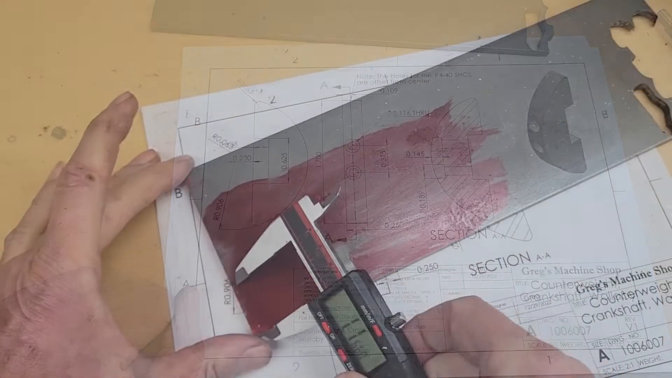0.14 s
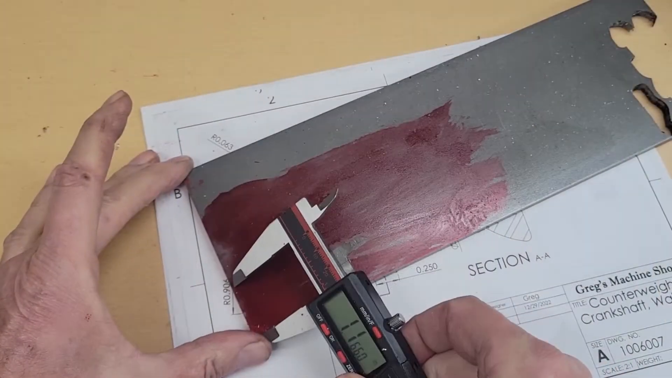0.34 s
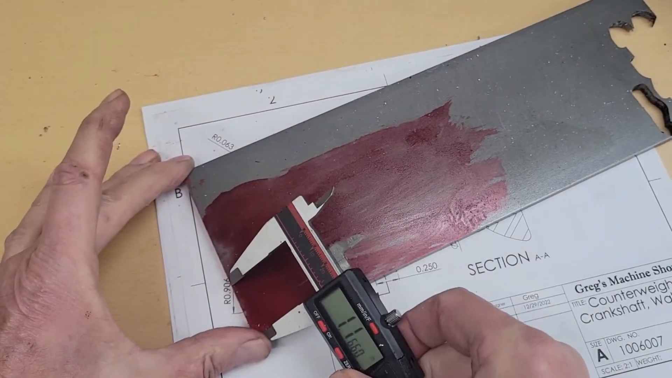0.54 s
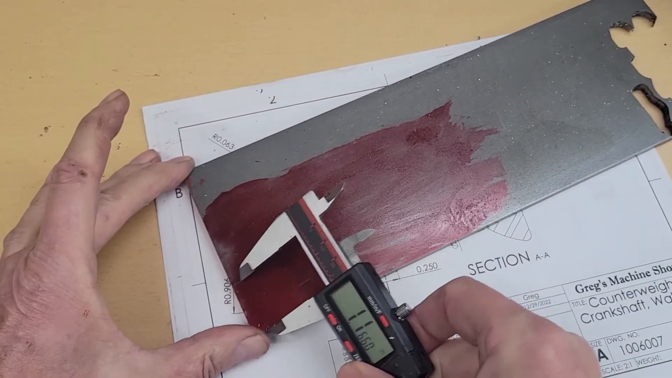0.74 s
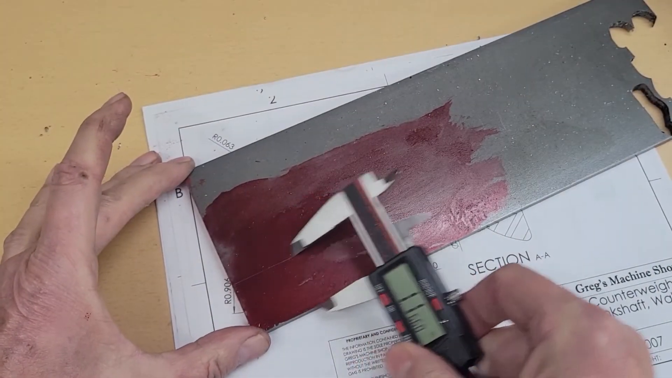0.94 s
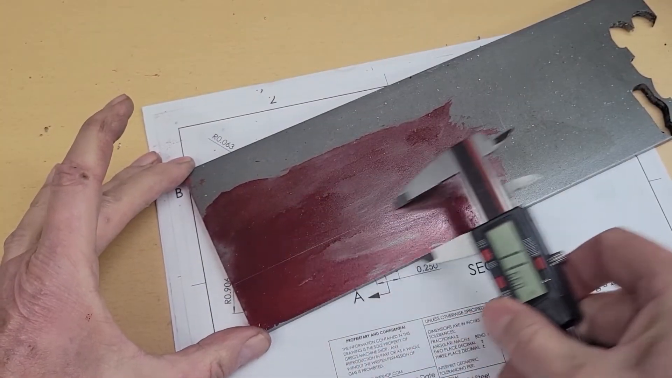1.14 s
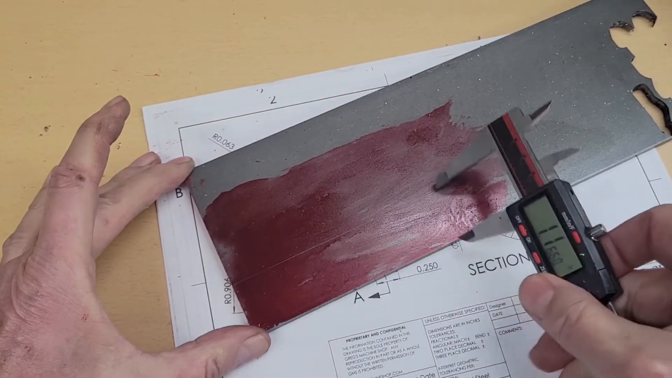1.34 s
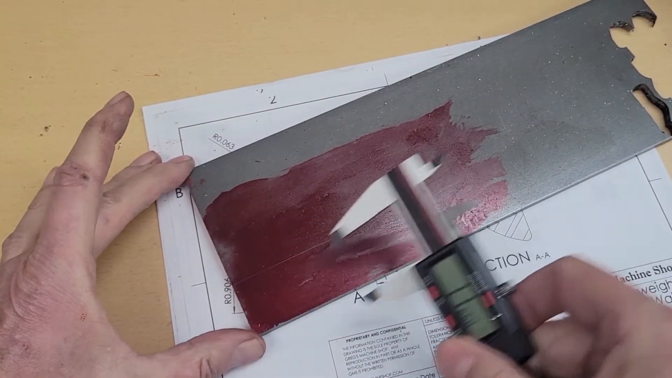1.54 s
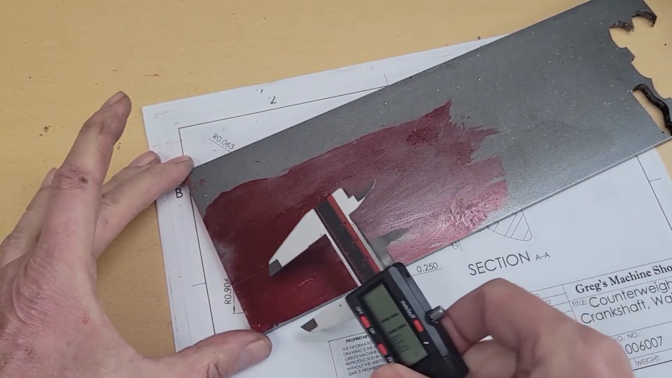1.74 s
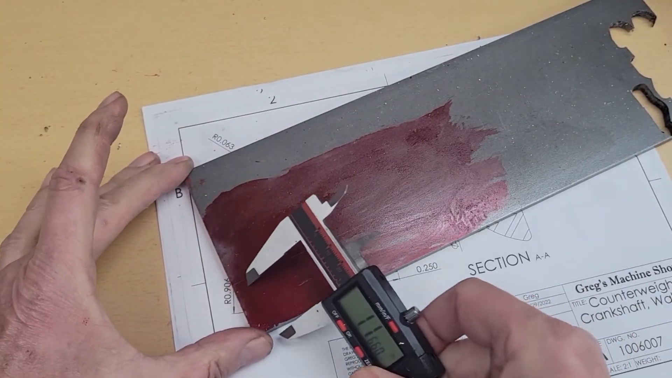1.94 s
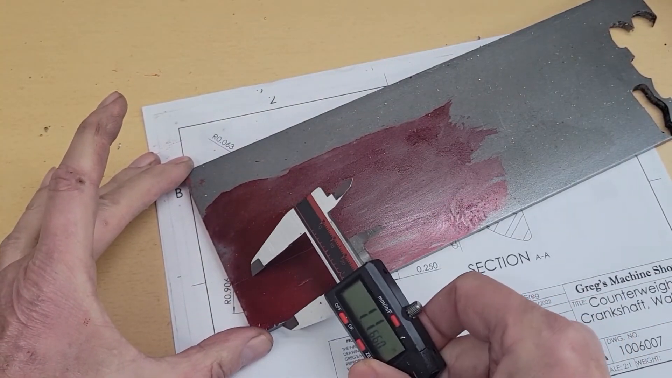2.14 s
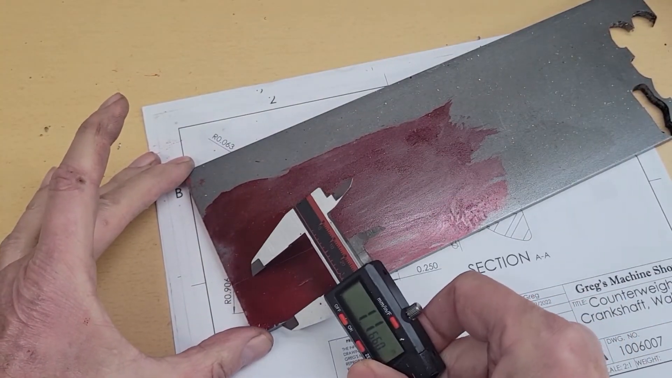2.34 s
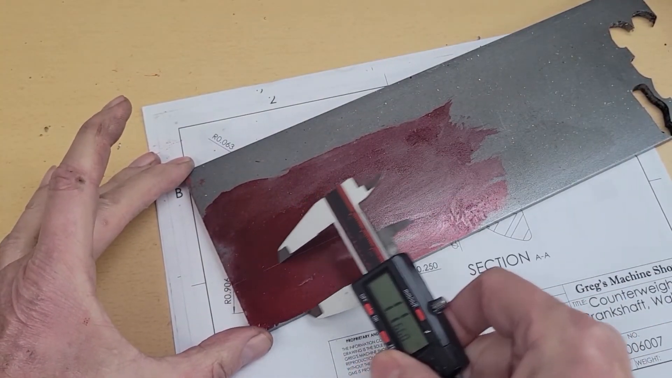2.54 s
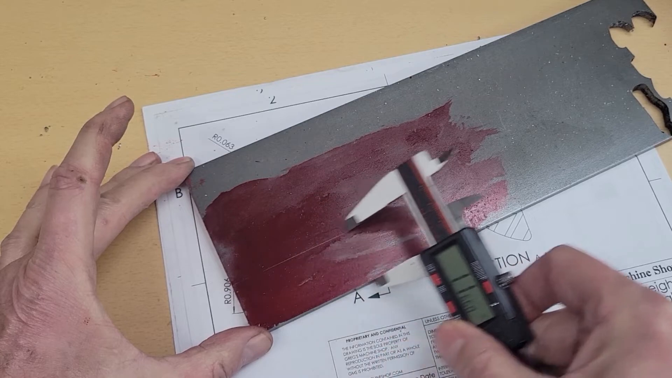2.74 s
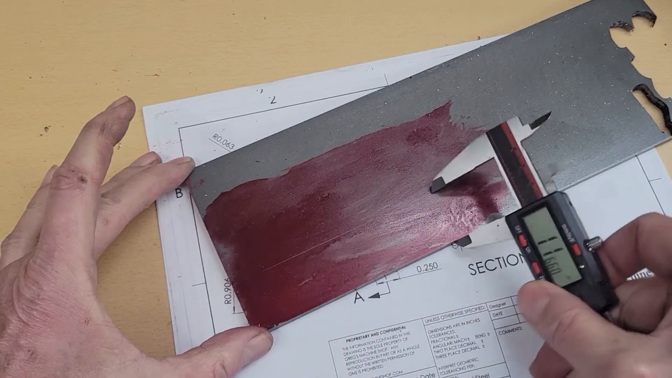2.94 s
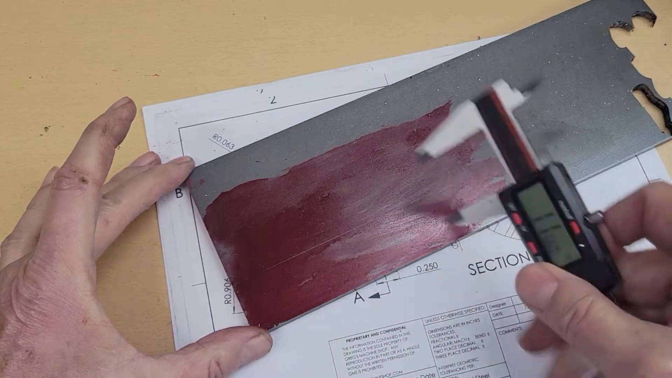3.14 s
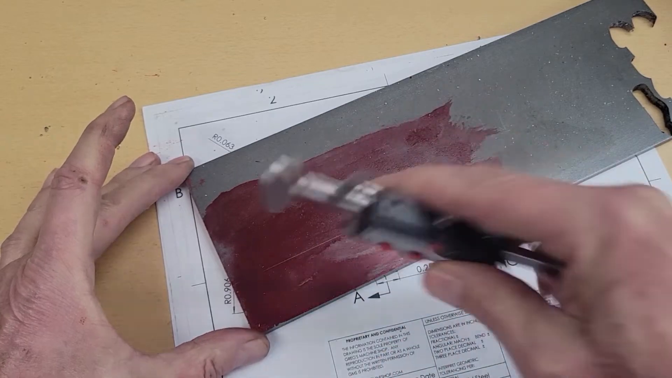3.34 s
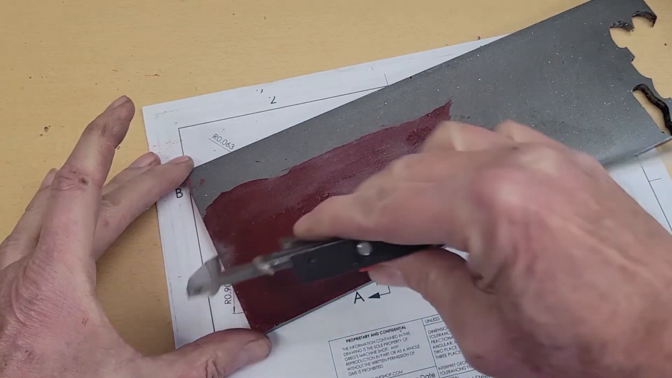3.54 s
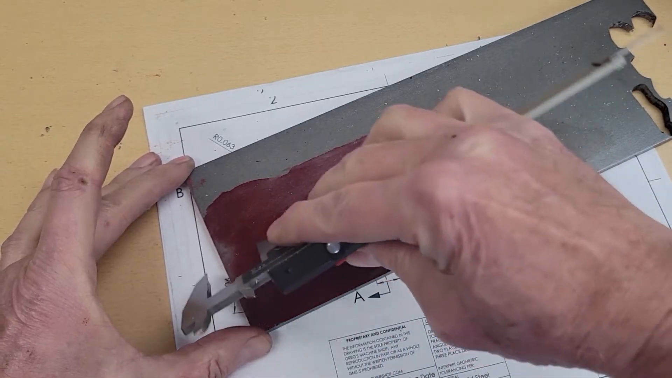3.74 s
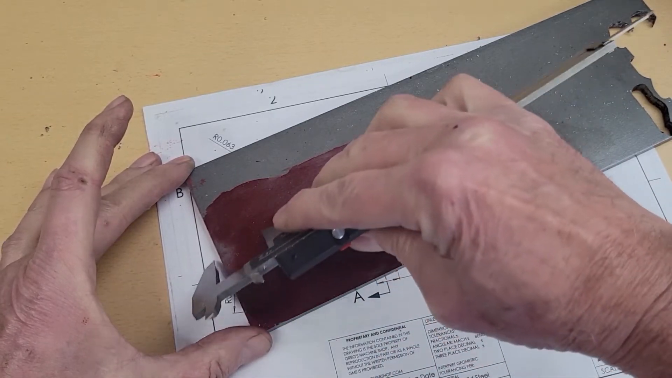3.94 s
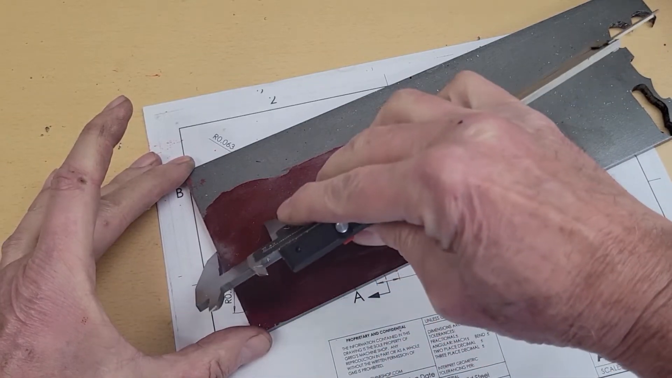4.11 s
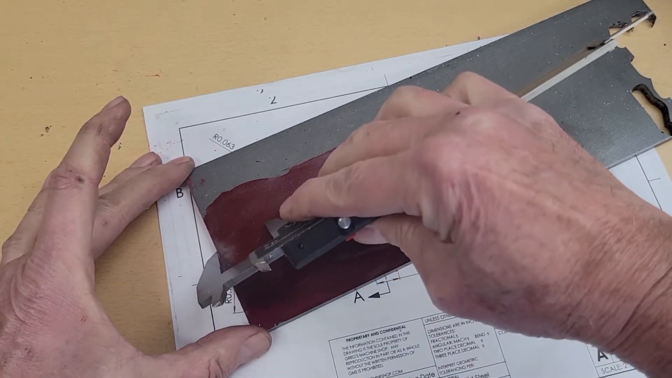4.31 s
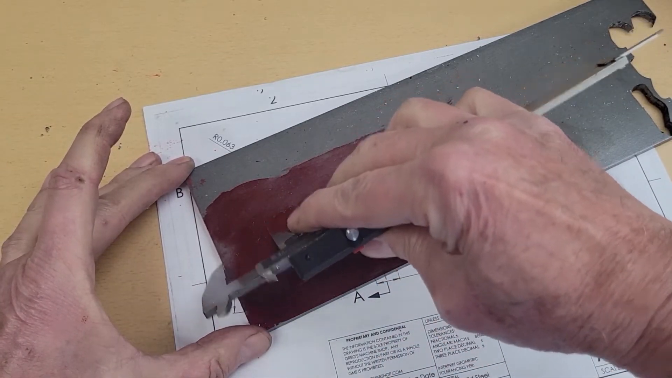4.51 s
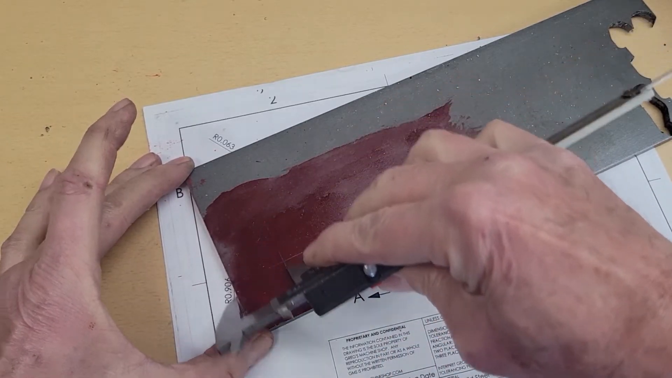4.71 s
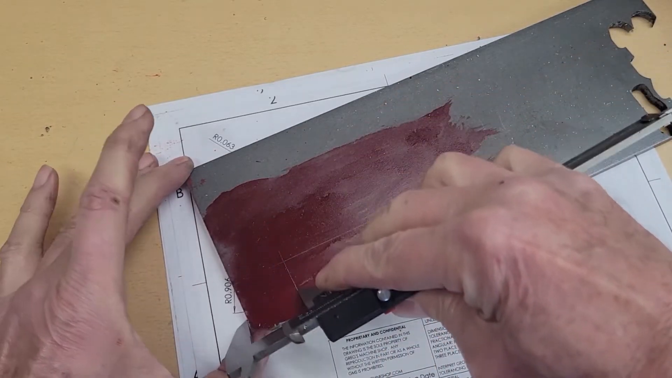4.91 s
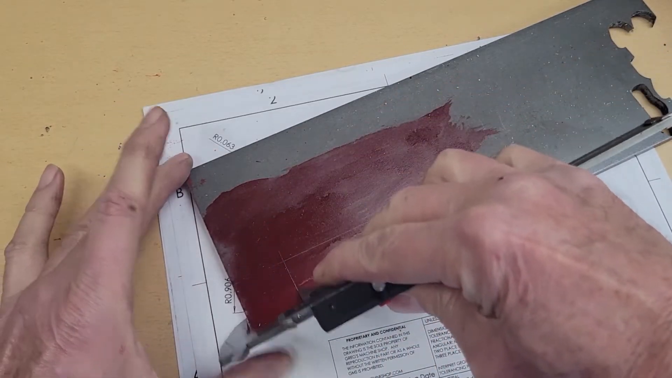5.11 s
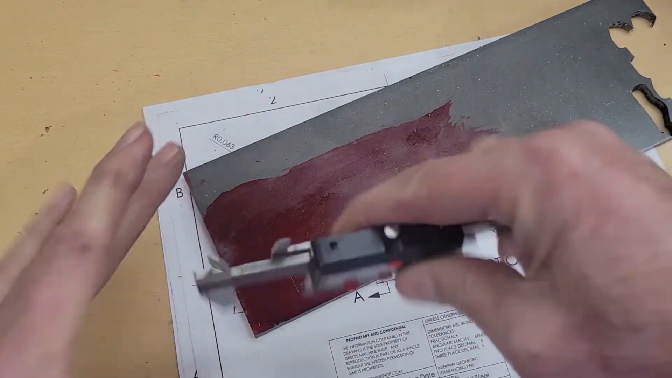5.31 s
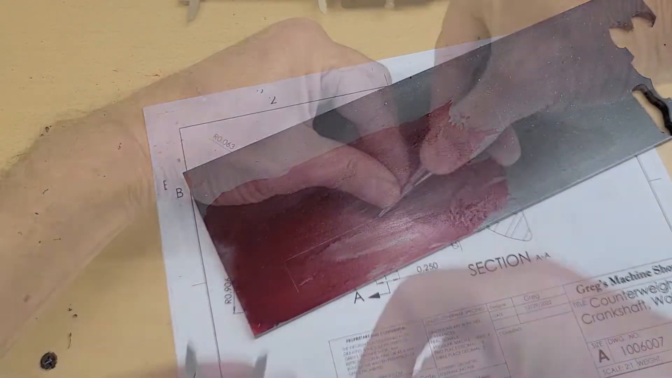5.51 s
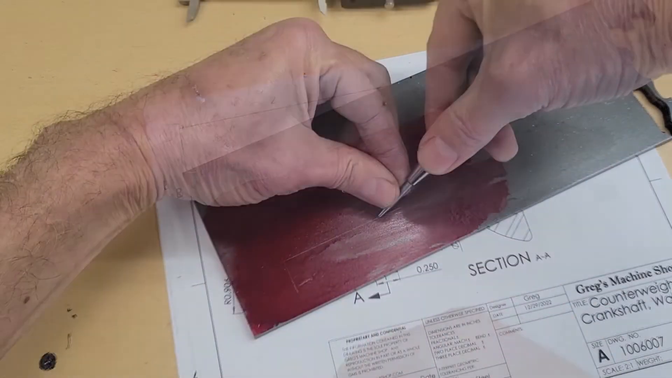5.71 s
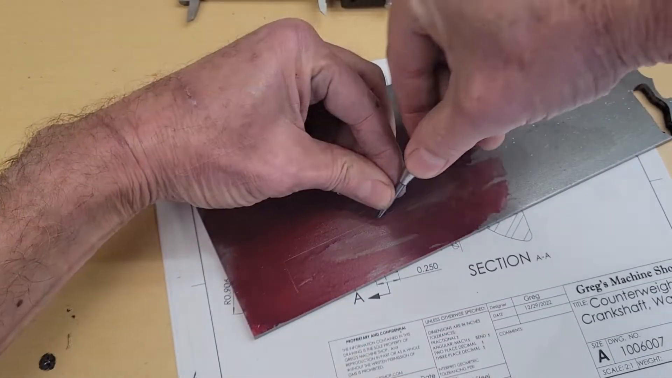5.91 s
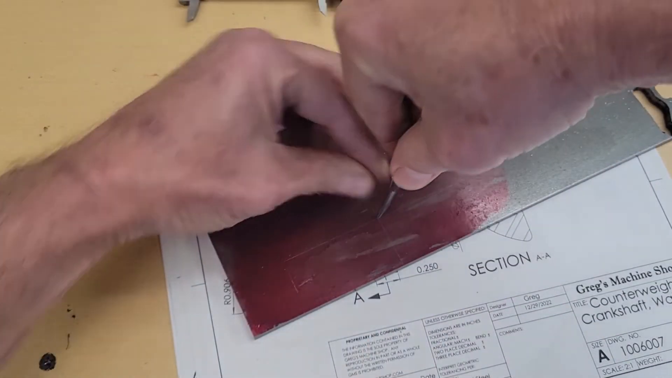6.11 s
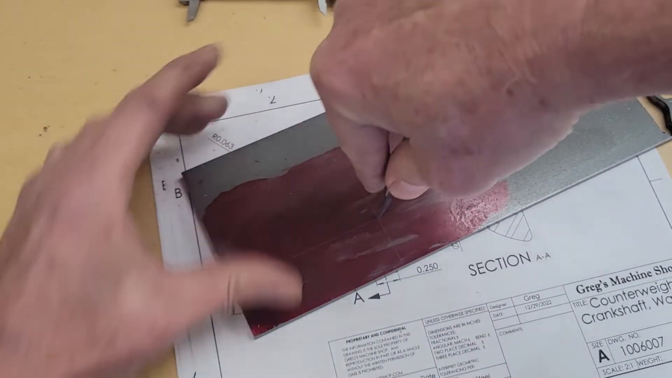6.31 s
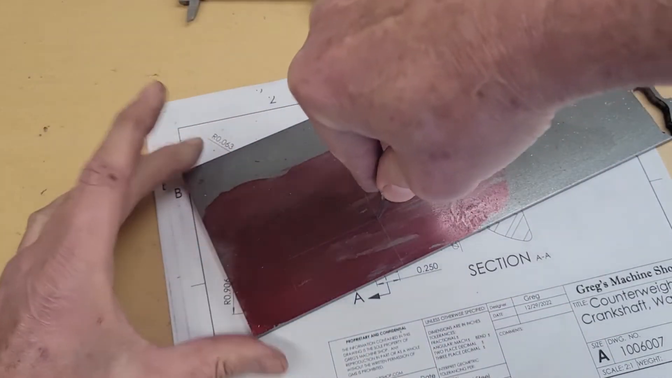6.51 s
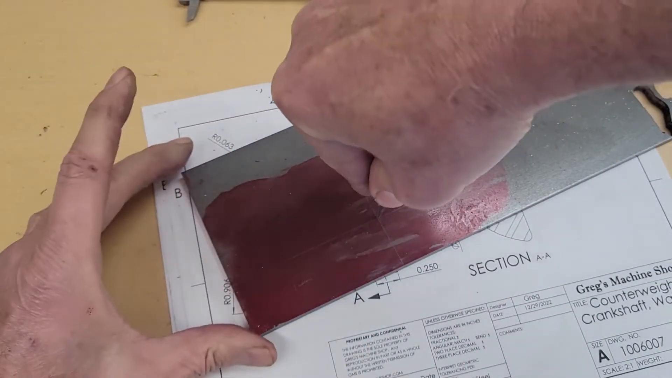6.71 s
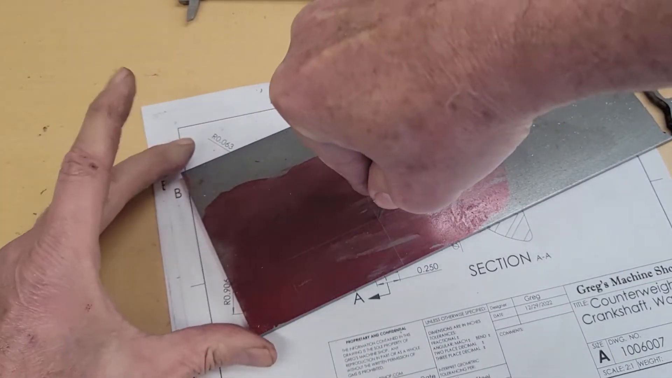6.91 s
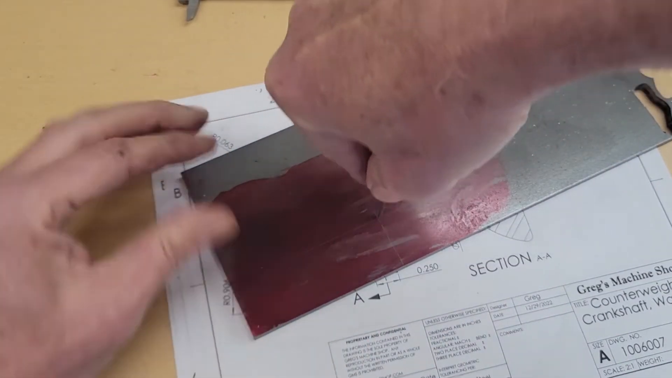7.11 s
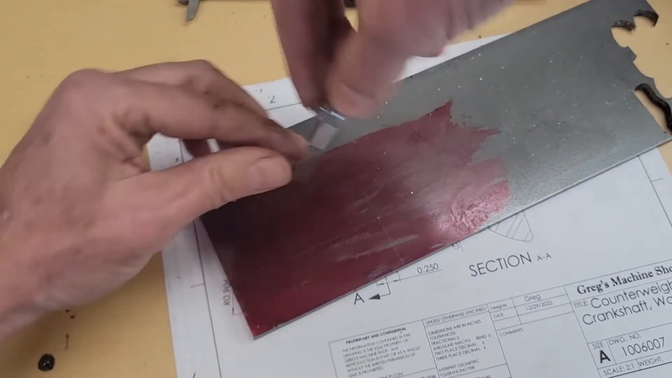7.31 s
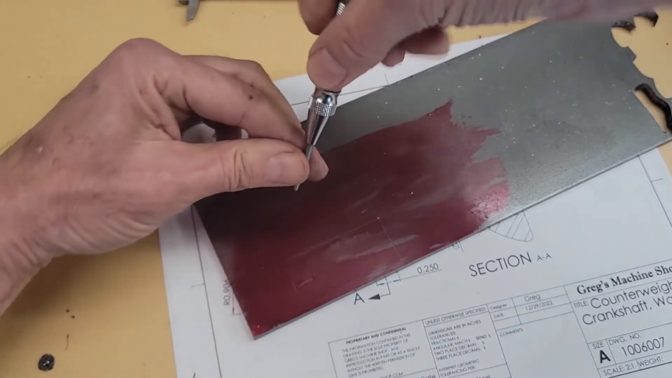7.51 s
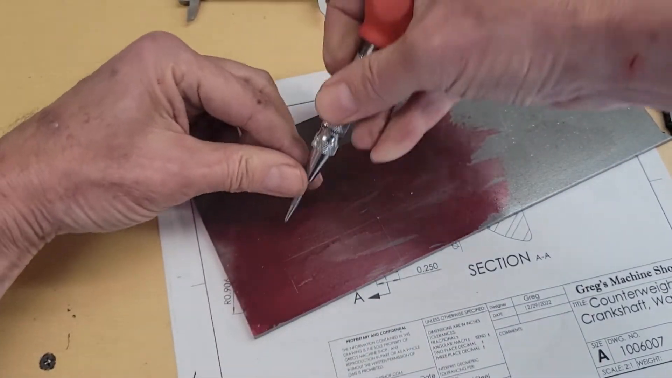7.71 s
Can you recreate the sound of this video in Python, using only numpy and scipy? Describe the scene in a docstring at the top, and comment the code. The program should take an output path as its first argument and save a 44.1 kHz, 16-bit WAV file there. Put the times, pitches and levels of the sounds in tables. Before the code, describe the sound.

A metal caliper scratches lines into a steel plate, then a spring punch snaps once, over a faint workshop hum.

```python
"""Scribing and punching steel

At a wooden workshop bench, close to the work, on a microphone with two spaced ports. A caliper jaw
scribes two lines along a dyed steel plate and one across it; then a spring punch is set and fires.
Grit under the point rings bench, plate and caliper; tools tap down and hands brush about.
Further off are mains hum, a low rumble and a short echo from the walls."""
import sys
import numpy as np
from scipy import signal
from scipy.fft import rfft, irfft
from scipy.io import wavfile
from scipy.ndimage import uniform_filter1d

SR = 44100
rng = np.random.default_rng(int(sys.argv[2]) if len(sys.argv) > 2 else 0)


def to_wav(sig):
    """Store sig (one row per channel, or 1-D mono) as 16-bit WAV at the path in sys.argv[1].

    Samples outside -1..1 are clipped; the rate is SR.
    """
    pcm = np.clip(np.atleast_2d(sig), -1, 1) * 32767
    pcm = np.round(pcm).astype(np.int16)
    wavfile.write(sys.argv[1], SR, pcm.T)  # frames by channels


N = 346405
RING = SR // 3  # samples in a body's answer

# the room behind the bench, and the colour of its echo: (frequency [Hz], level per Hz [dB])
ROOM_TONE = [(20, -24), (45, 0.5), (72, 3), (110, -5), (170, -19.5), (250, -8.5), (480, -23), (620, -28.5),
             (1500, -29.5), (2300, -37), (16000, -46.5)]
WALL_COLOUR = [(60, 4), (300, 3), (1500, -3), (6000, -7.5), (16000, -5.5)]
# mains harmonics: (frequency [Hz], level [dB])
MAINS_HUM = [(240, -86.5), (360, -70.5), (480, -85), (840, -100), (1800, -94)]
# the background level rises after the start, dips briefly near 5.6 s and is lower again at the end: (time [s],
# level [dB])
ROOM_SWELL = [(0, -2.5), (.3, 1), (5.4, -0.5), (5.599, -6.5), (5.9, 0), (7.5, -2.5)]
# caliper set down, nudged or catching: (time [s], plate [dB], bench [dB], tick [dB], plate pitch [Hz],
# plate bending [dB], bench boom [dB], plate damping t60 [s])
CALIPER_TAPS = [(0.1514, -39.5, -41, -50.5, 2100, -45.5, -51, 0.16),
                (0.4678, -68, -48, -77, 3340, -56, -63, 0.11),
                (0.723, -48, -56, -79, 3530, -47.5, -46.5, 0.071),
                (.878, -37.5, -65, -49, 3270, -40.5, -48.5, 0.11),
                (1.003, -30, -63, -70, 3700, -67, -66.5, 0.04),
                (1.43, -77.5, -75, -65.5, 5400, -93, -89, 0.043),
                (1.9457, -45.5, -47, -67, 2000, -57.5, -74, 0.08),
                (2.0523, -47, -44.5, -61, 2380, -57, -76, 0.055),
                (2.832, -28, -68, -34, 3790, -75, -64, 0.046),
                (2.889, -33, -56, -34, 4500, -77, -74, 0.049),
                (3.1338, -61, -89, -70, 3500, -93, -87, 0.18),
                (3.253, -53, -80, -51.5, 4100, -70, -68, 0.35),
                (3.2956, -32, -65, -32.5, 4950, -40.5, -67.5, 0.16),
                (3.8612, -49.5, -42, -88, 3880, -44.5, -53.5, 0.18),
                (4.0323, -50, -45.5, -65.5, 2820, -53, -57, 0.17),
                (4.3222, -51.5, -59, -64, 5600, -90, -56, 0.01),
                (4.4365, -52.5, -32.5, -65, 3260, -44, -48, 0.077),
                (4.4955, -42.5, -59, -50, 4400, -43, -46.5, 0.062),
                (4.558, -41.5, -45, -52.5, 3820, -41, -62, 0.095),
                (4.641, -45, -61, -52, 4200, -45, -43.5, 0.072),
                (4.763, -42, -50, -58, 3960, -36.5, -37, 0.054),
                (4.829, -46.5, -37, -59, 3960, -64, -62, 0.059),
                (5.3592, -63.5, -77, -77, 3900, -101, -77.5, .07),
                (5.6398, -61.5, -77, -56, 3720, -93, -79.5, 0.044),
                (7.8324, -90, -51, -66, 1440, -99, -53, 0.036)]
# spring punch set, cocked, fired and lifted: columns as for the taps
PUNCH_BLOWS = [(6.004, -36.5, -39.5, -67, 3500, -36, -46.5, 0.25),
               (6.017, -63.5, -71, -59.5, 6120, -73, -76, 0.034),
               (6.072, -53, -70, -71.5, 2930, -88, -71.5, 0.046),
               (6.342, -58, -65, -88, 2640, -71, -63, 0.051),
               (6.3654, -44, -71, -86, 2370, -55, -64, 0.024),
               (6.4418, -64.5, -60.5, -71.5, 6000, -85, -70.5, 0.066),
               (6.6412, -53, -43, -74.5, 2070, -45, -35.5, 0.05),
               (6.7221, -17, -22.5, -13.5, 3070, -11.5, -24, 0.73),
               (6.9871, -60, -68, -68, 2000, -55.5, -58, 0.072),
               (7.0758, -35, -38, -41.5, 5520, -39.5, -36.5, 0.11),
               (7.15, -32.5, -48, -32.5, 3810, -81, -52, .12)]
# hands and tools brushing paper and steel, and (at 6.694 s) the spring punch's hammer sliding free as it fires:
# # (start [s], rise [s], fall [s], plate scrape [dB], bench rumble [dB], fine hiss [dB])
HAND_RUBS = [(0.302, 0.17, 0.028, -75, -62.5, -101), (1.927, 0.11, 0.15, -64.5, -55.5, -81),
             (3.86, 0.011, 0.056, -64.5, -47, -83.5), (4.05, 0.046, 0.056, -91, -58, -100),
             (5.051, 0.055, 0.044, -73.5, -61.5, -61), (5.933, 0.026, 0.11, -62.5, -67.5, -100),
             (6.13, 0.061, 0.28, -90, -75.5, -84), (6.299, 0.056, .03, -74, -60, -96.5),
             (6.39, 0.036, 0.068, -81.5, -74, -72), (6.499, 0.039, 0.29, -67.5, -64, -73),
             (6.694, 0.026, 0.0044, -28, -31, -33.5), (7.02, 0.056, 0.0073, -64.5, -65, -80)]
# two strokes along the plate, each a list of (time [s], pressure [dB], speed [0-1], squeal [dB])
STROKES_ALONG = [
    [(.67, -77.5, 0, -100), (.73, -57.5, 0.13, -94.5), (.8, -52.5, 0.24, -70), (.88, -49, 0.03, -64),
     (.96, -60, 0.8, -39.5), (1.02, -59, 0.94, -44), (1.1, -62, 1, -49), (1.22, -54, 0.39, -42.5),
     (1.33, -93.5, 0, -101)],
    [(2.41, -81, 0, -100), (2.46, -55, 0.09, -76.5), (2.52, -55, 0.35, -73), (2.6, -64, 0.6, -47),
     (2.66, -57.5, 0.56, -55), (2.74, -60, 0.76, -47), (2.84, -58.5, 1., -43.5), (2.91, -55, 0.56, -44),
     (3.02, -105, 0, -102.5)],
]
# one drag across it: (time [s], pressure [dB], speed [0-1])
STROKE_ACROSS = [(4.33, -96, 0.), (4.36, -61, 0.), (4.44, -53, 0), (4.52, -45, 0), (4.65, -43.5, 0.33),
                 (4.78, -46.5, 0.07), (4.86, -52.5, 0.11), (4.98, -95.5, 0.2)]
# gain over the pressure, a row each for scrape, hiss and (along only) caliper ring:
# (level at rest [dB], gain at full speed [dB])
ALONG_GAINS = [(-0.5, 17), (-18.5, 34.5), (-14.5, 31.5)]
ACROSS_GAINS = [(-19, 26), (-25.5, 13)]
# ringing bodies: (frequency [Hz], level [dB], t60 [s])
PLATE_MODES = [(2040, 1, .25), (2110, -3, .12), (2250, -5, .2), (2546, -6, .4), (3030, -4, .25),
               (3140, -2, .1), (3340, -5, .3), (3521, -2, .2), (3620, -4, .15), (3960, -2, .27),
               (4190, -4, .1), (4474, -6, .2), (5236, -10, .3), (5640, -9, .15), (6045, -3, .2)]
BENCH_MODES = [(166.7, 0.5, 0.17), (198.5, -7.5, 0.27), (228.6, -7, 0.4), (237, 4.5, 0.16),
               (280.5, 0.5, 0.09), (342, 1, 0.08), (378.8, 2.5, 0.071), (409, -4.5, 0.1),
               (477.1, 1.5, 0.052)]
BOOM_MODES = [(77, 0, .4), (86, -12, .2)]  # the bench's deepest
CALIPER_MODES = [(1990, -4, .11), (3010, -2, .13), (3332, -9, .12), (3540, -6, .1), (3612, -2, .08),
                 (3778, 2, .07), (4195, -7, .07), (4750, -6, .03), (5400, -11, .08), (5940, -3, .06),
                 (6030, -1, .06), (7070, -10, .08)]
SQUEAL_MODES = [(2228, -10, .1), (2331, -8, .08), (2398, -3, .1), (2527, -1, .09), (2551, -3, .2),
                (2605, -8, .1)]  # the jaw sings these only while it slides
PUNCH_MODES = [(5650, -3, .2), (7823, -1, .18), (8010, -5, .14), (9080, -3, .17), (9551, -9, .14),
               (10730, -4, .13), (11445, -1, .11), (12200, -8, .1), (12750, -5, .1), (13118, -2, .12),
               (14121, -7, .12), (15300, -7, .13)]
# the plate bending: (frequency [Hz], level struck [dB], t60 [s], level scraped [dB])
BENDING_MODES = [(548, -6, .15, 6), (658, -3, .1, -9), (698, 0, .18, -9), (757, -4, .13, 0),
                 (797, -1, .25, -14), (852, -1, .2, -18), (913, 0, .25, -22), (1000, -1, .15, -12),
                 (1080, 1, .15, -2), (1165, -2, .15, -8), (1238, 1, .25, -12), (1420, -5, .15, -12)]
# dense lesser plate modes, and grit heard directly: (frequency [Hz], level per Hz [dB])
PLATE_GRAIN = [(600, -41.5), (1000, -16.5), (1800, 0.5), (2700, -10), (4000, -4.5), (6500, -16),
               (8500, -25.5), (12000, -45)]
GRIT_HISS = [(3530, -30), (6030, -5.5), (6700, -13), (8930, -13.5), (10300, -20.5), (12600, -14),
             (14700, -22.5), (16000, -22.5)]

PORT_LAG_S, ALIKE_HZ = 0.00034, 1980  # the ports' likeness fades above this pitch
BASS_HZ, TOP_HZ, CEILING = 49, 15800, .7
ROOM_TONE_DB, WALLS_DB, WALLS_T60_S = -69.5, -11.5, 0.34
CONTACT_S, TICK_RISE_S, TICK_T60_S, HISS_T60_S = 0.0021, 0.00031, 0.034, 0.078
BENCH_RISE_S, BOOM_RISE_S = .005, .018  # the heavy bench top is slow to move
PRESSED_T60_S, BENCH_SPOT_DB = 0.31, 3  # a pressing hand damps the bench; scatter from spot to spot
LIGHT_BLOW_DB, HARD_BLOW_DB, FAVOUR_DB_PER_OCTAVE = -44.5, -10.5, -30.5
CLINK_DB, JAW_DOWN_UNTIL_S = -2.5, 2.2
PUNCH_BENCH_HZ, PUNCH_BENCH_DB_PER_OCTAVE, PUNCH_RING_DB = 240, -12.5, -0.5


def undb(db):
    """dB to gain."""
    return 10 ** (np.asarray(db) / 20)


def unit(x):
    """Energy 1 in each channel on average."""
    return x / np.sqrt(np.sum(x ** 2) / 2)


def rise(seconds):
    """A body takes a moment to start ringing."""
    return np.clip(np.arange(RING) / SR / seconds, 0, 1)


def fade(t60):
    """Decay by 60 dB in t60 seconds."""
    return 1000. ** (-np.arange(RING) / SR / t60)


def crest(answer):
    """Typical peak of an answer."""
    return 3 * np.sqrt(uniform_filter1d(np.mean(answer ** 2, axis=0), SR // 80).max())


def convolve(force, answer):
    """Force in, sound at both ports out."""
    return signal.oaconvolve(np.atleast_2d(force), answer, axes=1)[:, :N]


def noise(colour, count):
    """Noise at both ports: alike in the bass, opposed where the gap is half a wave, unrelated above."""
    hz = np.fft.rfftfreq(count, 1 / SR) + 1
    at, db = np.transpose(colour)
    gain = undb(np.interp(np.log(hz), np.log(at), db, right=-90))
    alike = np.cos(2 * np.pi * hz * PORT_LAG_S) * np.exp(-hz / ALIKE_HZ)
    mid, side = rfft(rng.standard_normal((2, count))) * gain
    mid, side = mid * np.sqrt(1 + alike), side * np.sqrt(1 - alike)
    return unit(irfft(np.array([mid + side, mid - side]), count))


def dense_modes(colour, t60):
    """Modes too dense to count: a dying burst of coloured noise."""
    return unit(noise(colour, RING) * fade(t60))


def modes(table, count=1, spread=0., uneven=0.98):
    """Answers (partial, port, sample) to a blow: count partials a mode, each with its own port lag."""
    hz, db, t60 = np.transpose(np.repeat(table, count, axis=0))[:, :, None]
    scatter, bearing, detune, polarity = rng.standard_normal((len(hz), 4, 1)).swapaxes(0, 1)
    t = np.arange(RING) / SR
    hz = hz * (1 + spread * detune)
    lag = np.pi * hz * PORT_LAG_S * uneven * (1 + 0.1 * scatter) * np.sign(bearing)
    ring = undb(db) * fade(t60) * (1 - np.exp(-t * hz * 2)) * np.sign(polarity)
    return np.stack([ring * np.sin(2 * np.pi * hz * t + side * lag) for side in (1, -1)], axis=1)


def bench_bodies():
    """How the things on the bench, and the bench itself, answer a blow at the microphone."""
    def bending(column):  # the long plate reaches the ports more unevenly
        table = np.array(BENDING_MODES)[:, [0, column, 2]]
        return unit(modes(table, count=3, spread=.007, uneven=1.1).sum(0))

    brighter = [(hz, db + 1.5 * np.log2(hz)) for hz, db in GRIT_HISS]
    return dict(hiss=dense_modes(GRIT_HISS, HISS_T60_S),
                plate=modes(PLATE_MODES, count=3, spread=.004),
                boom=unit(modes(BOOM_MODES).sum(0) * rise(BOOM_RISE_S)),
                wood=modes(BENCH_MODES) * rise(BENCH_RISE_S),
                caliper=unit(modes(CALIPER_MODES).sum(0)),
                squeal=unit(modes(SQUEAL_MODES).sum(0)),
                bending_struck=bending(1), bending_scraped=bending(3),
                tick=dense_modes(brighter, TICK_T60_S) * rise(TICK_RISE_S),
                punch=unit(modes(PUNCH_MODES, count=2, spread=0.002).sum(0)))


def workshop():
    """Behind the bench: mains hum, wavering a little, over the rumble and hiss of the room."""
    t = np.arange(N) / SR
    out = undb(ROOM_TONE_DB) * np.sqrt(N) * noise(ROOM_TONE, N)
    for hz, db in MAINS_HUM:
        waver = uniform_filter1d(np.repeat(rng.standard_normal(N // 6000 + 1), 6000)[:N], 6000)
        lag = np.array([[1], [-1]]) * np.pi * hz * 0.00018
        out += np.sqrt(2) * undb(db + 0.21 * waver) * np.sin(2 * np.pi * (hz * t + rng.random()) + lag)
    return out * undb(np.interp(t, *np.transpose(ROOM_SWELL)))


def plate_spot(body, hz, db_per_octave, grain_db, t60):
    """One spot on the plate: a chance mix of modes tilted about a pitch, damped by hand or tool."""
    plate = body["plate"]
    mode_hz = np.repeat(np.array(PLATE_MODES)[:, 0], len(plate) // len(PLATE_MODES))
    share = undb(db_per_octave * np.abs(np.log2(mode_hz / hz)) + 3.2 * rng.standard_normal(len(plate)))
    ring = unit(np.tensordot(share, plate, 1) * fade(t60))
    return unit(ring + undb(grain_db) * dense_modes(PLATE_GRAIN, 0.53 * t60))


def blows(table, column, answer):
    """A body struck once a row, its answer peaking near the level in the given column."""
    force, rows = np.zeros(N), np.array(table)
    force[(rows[:, 0] * SR).astype(int)] = undb(rows[:, column]) / crest(answer)
    return convolve(force, answer)


def plate_struck(body, table):
    """Each blow ticks, bends and rings the plate; a light one favours the modes near its pitch."""
    out = np.zeros((2, N + RING))
    for s, db, _, _, hz, _, _, t60 in table:
        light = np.clip((HARD_BLOW_DB - db) / (HARD_BLOW_DB - LIGHT_BLOW_DB), 0, 1)
        spot = plate_spot(body, hz, light * FAVOUR_DB_PER_OCTAVE, grain_db=-1.5, t60=t60)
        clank = spot * rise(CONTACT_S)
        out[:, int(s * SR):int(s * SR) + RING] += undb(db) * clank / crest(clank)
    return out[:, :N] + blows(table, 3, body["tick"]) + blows(table, 5, body["bending_struck"])


def bench_struck(body, table, favour_db=0):
    """Each knock lands on another spot and gives its own mix of the bench modes, over a deep boom."""
    out = np.zeros((2, N + RING))
    for s, _, db, *_ in table:
        share = undb(favour_db + BENCH_SPOT_DB * rng.standard_normal(len(BENCH_MODES)))
        thud = np.tensordot(share, body["wood"], 1)
        out[:, int(s * SR):int(s * SR) + RING] += undb(db) * thud / crest(thud)
    return out[:, :N] + blows(table, 6, body["boom"])


def caliper_taps(body):
    """The caliper knocks the bench; early on, while the jaw is down, it clinks too."""
    early = [tap for tap in CALIPER_TAPS if tap[0] < JAW_DOWN_UNTIL_S]
    return bench_struck(body, CALIPER_TAPS) + undb(CLINK_DB) * blows(early, 1, body["caliper"])


def grit(per_second, spread_db, slip_db):
    """Dense clicks of uneven size; sticking and slipping shift their strength about every 11 ms."""
    clicks = (rng.random(N) < per_second / SR) * rng.standard_normal(N)
    clicks *= undb(spread_db * rng.exponential(size=N))
    slips = uniform_filter1d(np.repeat(rng.standard_normal(N // 500 + 1), 500)[:N], 300)
    clicks *= undb(slip_db * slips)
    return clicks / np.std(clicks)


def plate_scraped(force, spots):
    """The moving contact fades from spot to spot, passing through them all every 0.45 s."""
    turn = np.arange(N) / SR / .45
    out = 0
    for k, spot in enumerate(spots):
        away = (turn - k / len(spots)) % 1 * len(spots)
        out += convolve(force * np.sin(np.pi / 2 * np.clip(away, 0, 2)), spot)
    return out


def bench_rumble(body, force, db_per_octave=0):
    """Friction bends the plate and shakes the hand-damped bench beneath it."""
    tilt = undb(db_per_octave * np.log2(np.array(BENCH_MODES)[:, 0]))
    bench = unit(np.tensordot(tilt, body["wood"], 1) * fade(PRESSED_T60_S))
    return convolve(force, bench + undb(-3.5) * body["bending_scraped"] + undb(-15.5) * body["boom"])


def hands_brushing(body, friction, spots):
    """Rubs on paper and steel, and the punch's hammer release, swell and die away; the early ones nudge the
    caliper into ringing."""
    t, swells = np.arange(N) / SR, np.zeros((3, N))
    for row in HAND_RUBS:
        shape_db = np.interp(t, np.cumsum(row[:3]), [-29, 0, -30], left=-200, right=-200)
        swells += np.outer(undb(row[3:]), undb(shape_db))
    scrape, rumble, fine = swells * friction
    clink = undb(CLINK_DB) * convolve(scrape * (t < JAW_DOWN_UNTIL_S), body["caliper"])
    return plate_scraped(scrape, spots) + clink + bench_rumble(body, rumble) + convolve(fine, body["hiss"])


def pressure(stroke, rest_db=0., speed_db=0., column=1):
    """Gain of one body during a stroke: pressure, plus a share that grows with speed."""
    t, track = np.arange(N) / SR, np.transpose(stroke)
    s = track[0]
    edge = np.clip(np.minimum(t - s[0], s[-1] - t) / 0.0025, 0, 1)
    return edge * undb(np.interp(t, s, track[column]) + rest_db + speed_db * np.interp(t, s, track[2]))


def scribe_along(body, friction, spots):
    """The jaw runs twice along the plate: grit rings the steel and the sliding jaw squeals."""
    def force(*gains, column=1):
        return friction * sum(pressure(stroke, *gains, column=column) for stroke in STROKES_ALONG)

    scrape, fine, ring = (force(*gains) for gains in ALONG_GAINS)
    jaw = convolve(ring, body["caliper"]) + convolve(force(column=3), body["squeal"])
    bench = bench_rumble(body, force(), db_per_octave=7.5)  # the sharp point stirs upper modes more
    return plate_scraped(scrape, spots) + jaw + bench + convolve(fine, body["hiss"])


def scribe_across(body, friction):
    """The jaw is dragged once across the plate, damping the steel as it goes."""
    spots = [plate_spot(body, hz=3840, db_per_octave=-17, grain_db=1, t60=0.019) for _ in range(4)]
    scrape, fine = (friction * pressure(STROKE_ACROSS, *gains) for gains in ACROSS_GAINS)
    bench = bench_rumble(body, friction * pressure(STROKE_ACROSS))
    return plate_scraped(scrape, spots) + bench + convolve(fine, body["hiss"])


def spring_punch(body):
    """The punch rings with each blow and knocks the bench, which favours one pitch where it stands."""
    octaves_off = np.abs(np.log2(np.array(BENCH_MODES)[:, 0] / PUNCH_BENCH_HZ))
    thuds = bench_struck(body, PUNCH_BLOWS, PUNCH_BENCH_DB_PER_OCTAVE * octaves_off)
    return thuds + undb(PUNCH_RING_DB) * blows(PUNCH_BLOWS, 3, body["punch"])


def scene():
    """The work close to the microphone, its echo off the walls, and the workshop behind."""
    body = bench_bodies()
    point = grit(9000, spread_db=2.0, slip_db=1.6)
    hand = grit(7000, spread_db=2.2, slip_db=0.35)
    drag = grit(9700, spread_db=1.8, slip_db=3.7)
    spots = [plate_spot(body, hz=3560, db_per_octave=2, grain_db=3, t60=0.037) for _ in range(4)]
    near = hands_brushing(body, hand, spots) + scribe_along(body, point, spots) + scribe_across(body, drag)
    near += plate_struck(body, CALIPER_TAPS + PUNCH_BLOWS) + caliper_taps(body) + spring_punch(body)
    walls = dense_modes(WALL_COLOUR, WALLS_T60_S) * np.clip(np.arange(RING) / SR / 0.00089 - .3, 0, 1)
    return near + undb(WALLS_DB) * convolve(near.sum(0) / np.sqrt(2), walls) + workshop()


def record(dry):
    """The microphone loses the deepest bass and rounds the loudest peak; the recorder cuts the top."""
    thin = signal.sosfilt(signal.butter(2, BASS_HZ, "high", fs=SR, output="sos"), dry)
    rounded = CEILING * np.tanh(thin / CEILING)
    return signal.sosfilt(signal.ellip(10, .2, 60, TOP_HZ, fs=SR, output="sos"), rounded)


dry = scene()
out = record(dry)
to_wav(out)
```